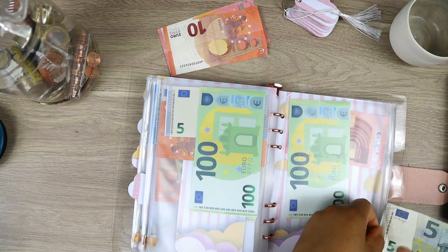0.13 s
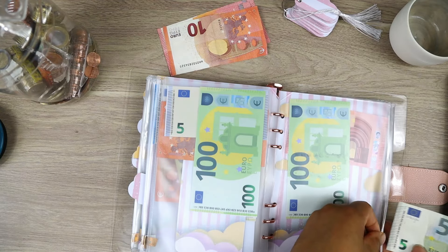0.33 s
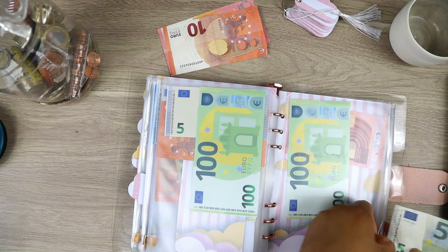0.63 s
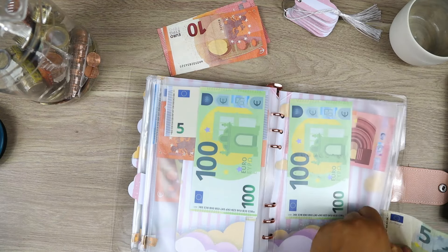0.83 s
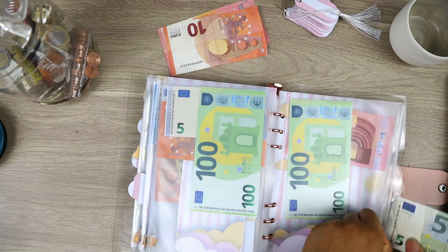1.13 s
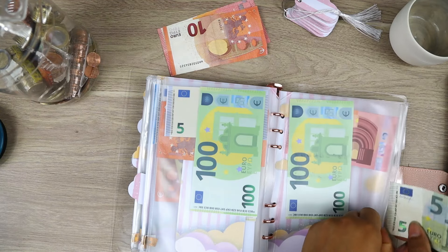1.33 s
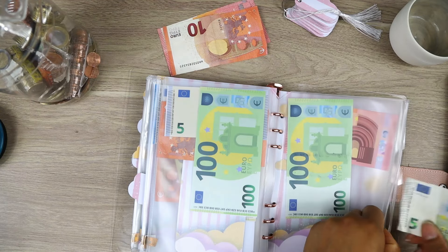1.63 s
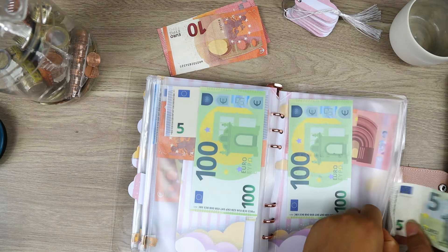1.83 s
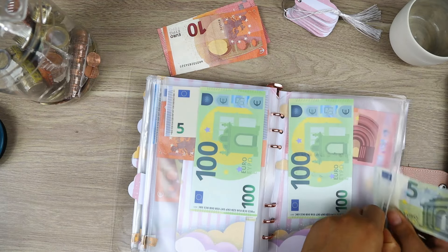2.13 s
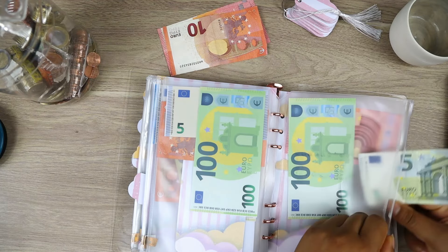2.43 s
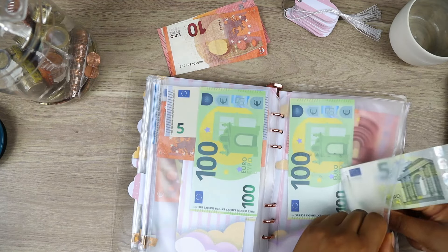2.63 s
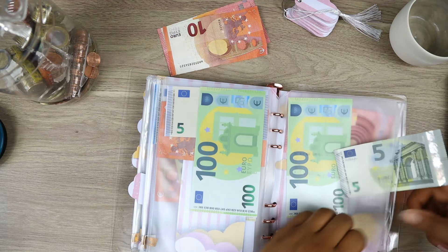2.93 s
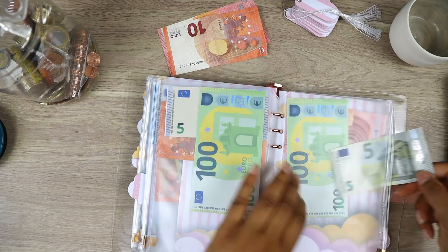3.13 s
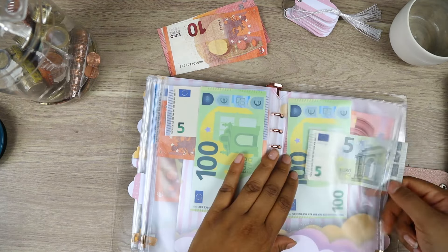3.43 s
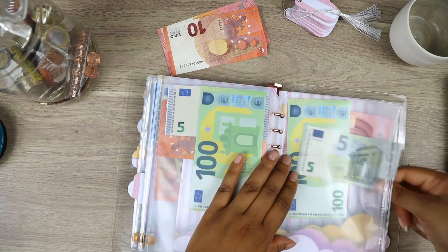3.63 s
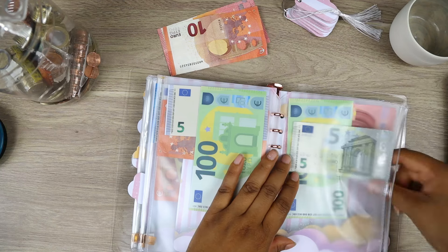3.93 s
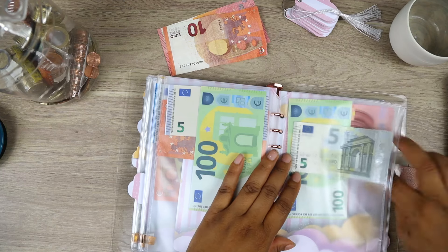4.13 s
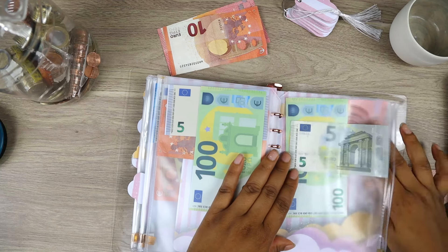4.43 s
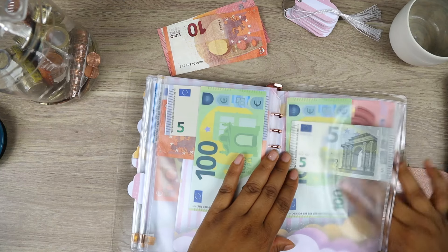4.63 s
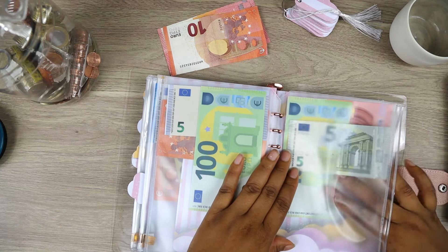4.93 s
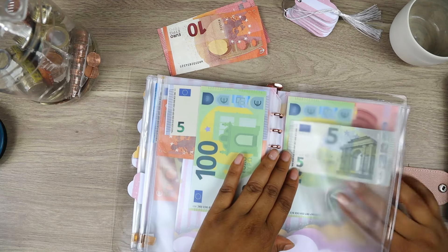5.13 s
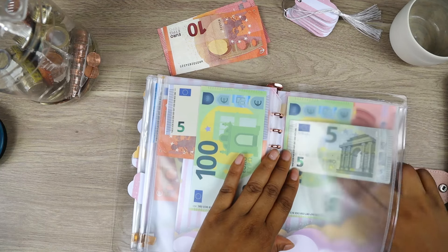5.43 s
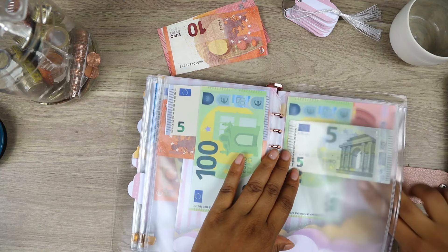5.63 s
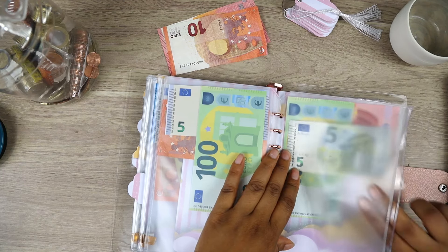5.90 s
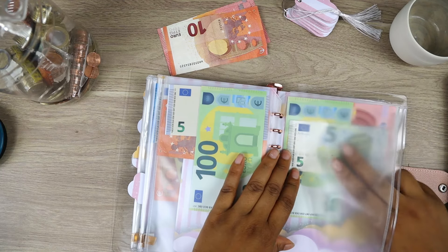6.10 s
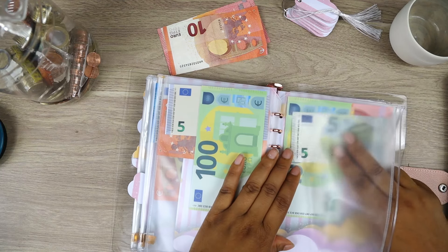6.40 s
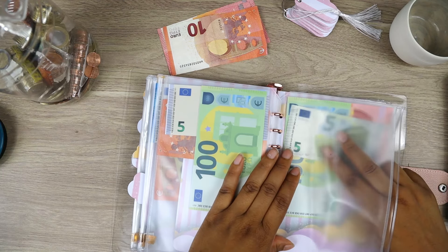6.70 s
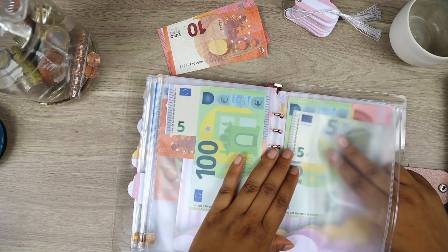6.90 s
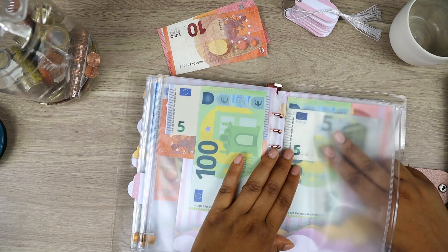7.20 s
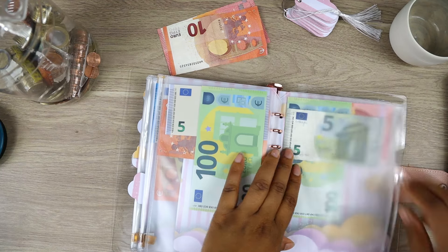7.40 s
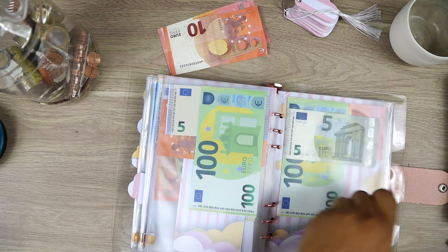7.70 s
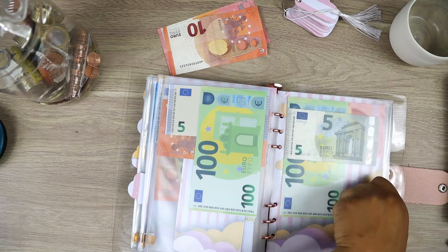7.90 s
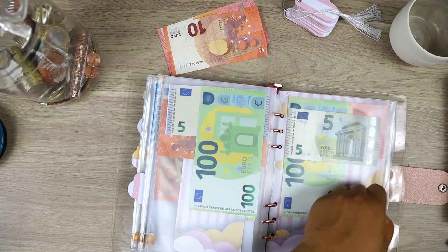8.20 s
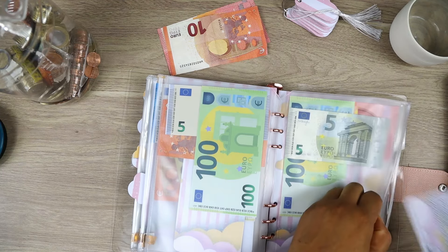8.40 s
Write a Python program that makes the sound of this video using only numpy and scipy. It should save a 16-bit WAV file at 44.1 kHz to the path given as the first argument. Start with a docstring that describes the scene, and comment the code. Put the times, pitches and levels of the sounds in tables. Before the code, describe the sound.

Thin plastic film buckles in dry, irregular clicks over papery swishes, heard close and slightly to the right. The busiest, loudest crackling comes in the first two and a half seconds, further snaps follow around three and a half, then gentle smoothing by fingers. Late on, plastic pops and dull light bumps on the wooden desk return. Faint room hiss and hum lie beneath.

```python
"""A clear plastic binder pocket takes a banknote on a wooden desk, close under a stereo microphone.
Its film buckles in sharp snaps: short noise bursts, coloured by the pocket, with a brief ring of modes.
Paper and fingers rub over it: noise driven by dense tiny slips, with ticking creases. Hand and binder
bump the desk, which sounds as decaying modes and noise. A small room answers with two echoes and a
diffuse tail, over faint shaped room noise, mains hum and a thin electronic whine."""
import sys
import numpy as np
from scipy import signal
from scipy.fft import rfft, irfft, next_fast_len
from scipy.io import wavfile
from scipy.ndimage import uniform_filter1d

SR = 44100
rng = np.random.default_rng(int(sys.argv[2]) if len(sys.argv) > 2 else 0)


def pcm_store(signal):
    """Save signal as 16-bit PCM."""
    levels = np.round(np.clip(np.atleast_2d(signal), -1, 1) * 32767)
    wavfile.write(sys.argv[1], SR, levels.astype(np.int16).T)


N = 377055
TIME = np.arange(N) / SR  # s

# Room noise at the microphone, relative outline: hz [Hz], level_db [dB]
AIR_OUTLINE = [(25, -17), (60, -2.5), (105, -2), (160, -7), (400, -4), (600, -10), (850, -6), (1250, -12),
               (1430, 0), (1650, -7), (3000, -9.5), (6000, -15), (10000, -19), (15500, -18.5)]
# Paper or fingers slide over the film. The pocket's edge is picked open; the note is drawn out and
# brought to the opening, then pushed in; fingers follow it and nudge it home; the hand withdraws and
# takes hold of the page.
# start_s [s], length_s [s], level_db [dB, before the swell], brightness_db [dB, relative]
STROKES = [ (-.03, 0.084, -34.5, -2.5), (0.1, 0.13, -46.5, -6), (0.284, 0.19, -47, -1),
           (0.846, 0.39, -53.5, -2), (1.002, 0.11, -43.5, 0), (1.155, 0.035, -40, -2.5),
           (1.243, 0.045, -40.5, -3), (1.343, 0.28, -49.5, -2), (1.656, 0.11, -38, -5),
           (1.934, 0.16, -41.5, -4.5), (2.178, 0.13, -40.5, -4), (2.245, 0.082, -32.5, 1),
           (2.332, 0.15, -30, -0.5), (2.467, 0.12, -43, -3), (2.704, 0.052, -46, 0), (2.842, 0.1, -43, 1.5),
           (2.919, 0.077, -42.5, -5), (3.009, 0.14, -37.5, -2.5), (3.164, 0.16, -46.5, -1.5),
           (3.287, 0.21, -37.5, -2.5), (3.53, 0.12, -35.5, -4.5), (3.715, 0.035, -41, 1),
           (3.778, 0.17, -41, 1), (3.918, 0.085, -40.5, -1.5), (4.05, 0.084, -46, -2.5),
           (4.171, 0.16, -51, -1), (4.319, 0.12, -43, -3), (4.668, 0.13, -44, -4), (4.717, 0.053, -41, -1),
           (4.774, 0.14, -40.5, -3), (5.068, 0.021, -50.5, -5), (5.227, 0.18, -43, -7),
           (5.431, 0.13, -35, -8.5), (5.6, 0.14, -50, -5), (5.687, 0.27, -48, -6), (5.98, 0.2, -51, -2.5),
           (6.143, 0.19, -45.5, -5), (6.425, 0.086, -58.5, 2.5), (6.502, 0.045, -52, -1),
           (6.693, 0.1, -51.5, -1), (6.919, 0.078, -51, -2.5), (7.06, 0.097, -58.5, -4),
           (7.414, 0.075, -44, -2.5), (7.474, 0.077, -40.5, 1), (7.526, 0.11, -50, -7.5),
           (7.666, 0.28, -52, -3.5), (7.925, 0.18, -49, -4.5), (8.115, 0.068, -36.5, -1),
           (8.232, 0.086, -45, -2), (8.327, 0.54, -52, 2)]
# Rubbed film and paper, relative outline inside each register: hz [Hz], level_db [dB]
RUB_OUTLINE = [(40, -52.5), (110, -10), (230, -16), (310, -11.5), (570, -17), (820, -3), (1500, 2),
               (2600, 0.5), (4200, 6.5), (8500, 0), (15500, -6.5)]
# Skin on film hisses higher than paper does: time_s [s], top_octave_db [dB]
SHEEN = [(1.5, -3), (3.3, 0), (4.4, 4.5), (4.7, 0.5), (7.5, -0.5), (8.3, -5)]
# Tiny creases that tick while the film is moved, relative outline: hz [Hz], level_db [dB]
CREASE_OUTLINE = [(100, -48), (400, -2), (1000, -13), (2000, 3.5), (5500, -16.5), (15500, -7)]
# Resonances of the pocket stack: pitch_hz [Hz], width_hz [Hz], lift_db [dB]
POCKET_RESONANCES = [(780, 365, 5), (1440, 290, 2), (1820, 98, 3.5), (2420, 42, 3.5)]
# Where the hands work: time_s [s], place [0 = open edge of the pocket, 2 = its middle]
HAND_PLACE = [(0, 0.24), (2, 0.44), (4.2, 1.16), (5.6, 0.66), (6.8, 1.66), (7.8, 1.18)]
# The film buckles: time_s [s], level_db [dB, rms of the first 6 ms before the room], ring_hz [Hz],
# body_db [dB, offset of the lows], crack_db [dB, offset of the treble], length_ms [ms, decay to 1/e]
SNAPS = [(0.0176, -32.5, 2040, -10, -18, 1.6), (0.042, -30.5, 1540, -36, -27, 2.6),
         (0.0895, -33, 2350, -6.5, -13.5, 3.2), (0.358, -24.5, 1530, -9.5, -18.5, 1.5),
         (0.3648, -25.5, 2380, -21, -24, 8.2), (0.37, -21, 2440, -9, -6.5, 1.9),
         (0.4603, -33, 1820, -14, -7, 0.59), (0.5622, -45, 2690, 5, 0, 5.4),
         (0.7061, -38.5, 2310, 0, -10.5, 0.68), (0.893, -43, 1960, -3, -15, 2.3),
         (0.9571, -42.5, 2030, 0, -13.5, 4.5), (1.155, -35, 2100, -8, -9, 0.5),
         (1.188, -39, 2420, -5, -4, 2.8), (1.243, -31.5, 3230, -2.5, -8.5, 9.1),
         (1.262, -34, 2070, 2, -16, 0.93), (1.2787, -35.5, 3440, -16, -13, 2.3),
         (1.2883, -36.5, 3080, -10, 8, 3.3), (1.3707, -35.5, 3010, -3, -10, 1.2),
         (1.411, -29.5, 2250, -5.5, -9, 1.7), (1.541, -38.5, 800, 8, -21, 3),
         (1.586, -30, 3040, -1, -8, 0.84), (1.655, -34.5, 880, -9, -25, 0.9),
         (1.7177, -19.5, 1840, -15, -15, 0.66), (1.7946, -33, 1410, -12, -25, 0.74),
         (1.93, -32, 1830, -4.5, -18.5, 1.2), (1.9609, -36.5, 3180, 6, 0, 1.7),
         (2.0281, -27, 1300, -11, -19, 3.4), (2.054, -17.5, 2036, -3, -10, 1.2),
         (2.2666, -24, 2720, -21, -17, 2.2), (2.277, -29, 4530, -32, -28, 3),
         (2.3683, -26.5, 2800, -28, -21, 8), (2.383, -30, 1890, -33, -21, 6.6),
         (2.4135, -36, 2700, -25, -23, 1.7), (2.428, -29, 4540, -15, -6, 2.8),
         (2.444, -25, 2570, -16, -16, 4.5), (2.5568, -39, 730, 4, -11, 0.83),
         (2.961, -35, 1900, -10, -18, 1), (3.051, -28.5, 2000, -6, -10, 1.7),
         (3.1424, -33, 1820, -11, -11, 1.5), (3.312, -28, 2270, -12.5, -19, 7.5),
         (3.4095, -22, 1570, -9, -7, 7.5), (3.4138, -17.5, 1416, -37, -35, 0.66),
         (3.541, -27.5, 1340, -11, -18.5, 4.2), (3.6024, -28.5, 2113, -14, -4.5, 1.7),
         (3.8698, -41, 921, 4, -17, 1.1), (3.917, -35, 4030, -23, -33, 2.7),
         (3.9866, -36.5, 1606, -8, -19, 3), (4.0285, -31, 2110, -9, -8, 5.7),
         (4.0445, -35, 1900, -7, -11, 3.1), (4.221, -41.5, 3080, -9, -11, 21),
         (4.356, -36.5, 910, 3, -10, 2.4), (4.4035, -43, 3070, -4, 1, 0.78),
         (4.416, -34.5, 1420, 11, -4, 2), (4.6367, -41.5, 1720, -6, -19, 0.3),
         (4.7972, -34.5, 840, -4.5, -33, 0.7), (5.035, -49.5, 2620, -15, -16, 1),
         (5.2405, -38.5, 1670, -2, -21.5, 0.22), (5.4975, -30.5, 1020, -16, -32, 1.1),
         (5.5184, -27.5, 2100, -21, -12.5, 2.7), (5.8749, -39, 1220, 5, -12, 2.4),
         (6.0288, -34.5, 934, -0.5, -9, 1.8), (6.187, -36.5, 970, -2, -17, 14),
         (6.2758, -42, 825, -5, -21, 3.7), (6.931, -47.5, 3320, -18, -13, 1.7),
         (7.0671, -51, 3320, -12, -19, 1.2), (7.3875, -49, 2500, 5, -3, 3),
         (7.402, -44, 3780, -4, -16, 2.5), (7.4412, -39.5, 1680, -3, -26, 2.2),
         (7.7232, -32.5, 1780, -1, -9.5, 1.1), (7.735, -38, 1440, -11, -13, 1.1),
         (7.757, -38.5, 1780, -11, -22, 1.8), (7.8075, -32, 3320, -8.5, -16.5, 5.1),
         (7.8437, -39, 2540, -17, -9, 3), (7.9184, -36, 1160, 8.5, -6.5, 4.4),
         (7.9457, -38.5, 2540, -9, -13, 0.72), (7.9732, -41, 1120, -2, -13, 0.5),
         (8.0182, -38.5, 2570, 1.5, -12, 1.5), (8.13, -34, 1250, 1, -21, 3.3),
         (8.1573, -31, 1140, 2, -26, 0.91), (8.176, -26, 860, -3, -22.5, 5.14),
         (8.3047, -42.5, 890, -6, -13, 1.1), (8.3863, -35, 1850, -6, -20, 2.6)]
# Crack of a snap, added to its crack_db: hz [Hz], lift_db [dB]
CRACK_OUTLINE = [(5500, 6), (9500, -5), (15500, -6)]
# Hand and binder bump the desk: time_s [s], knock_db [dB, relative], boom_db [dB, relative],
# rumble_db [dB, settling binder in the mix with the low modes]
BUMPS = [(2.557, -38, -58, 1), (2.959, -43.5, -66, -5), (3.05, -38.5, -66, 3), (5.464, -43, -61, -4),
         (5.52, -41, -44.5, -16), (5.879, -45, -82, -5), (7.438, -42, -57.5, -7), (7.732, -42, -42, 10),
         (7.768, -50, -48, 14), (7.81, -39.5, -44, 8), (7.92, -46, -53, 5), (8.13, -56, -48, -30),
         (8.182, -56, -47.5, -22), (8.306, -44, -53, 25), (8.386, -50, -56, -5.5)]
# Modes of the desk top: pitch_hz [Hz, before detuning], t60_s [s], level_db [dB, relative]
DESK_MODES = [(50, 0.11, -38), (78, 0.16, -37), (124, 0.27, -7), (301, 0.066, 6.5), (332, 0.091, -10),
              (428.6, 0.22, -3)]
# How the spots reach the microphone from its right: place [as above], lag_ms [ms, left port behind
# right], pan_db [dB, left minus right in short waves, before the treble tilt]
PORTS = [(0, 0.11, -2.5), (1, 0.099, -5.5), (2, 0.033, -5)]
# Two nearby hard surfaces throw each sound back: left_ms [ms after the direct sound at the left
# port], right_ms [ms, likewise at the right port], level_db [dB against the direct sound]
ECHOES = [(7.3, 7.6, -15.5), (10.2, 9.9, -16.5)]

# seven spots on the pocket that sound, from 0 at its open edge to 2 at its middle
SPOTS = np.linspace(0, 2, num=7)
AIR_DB, HUM_DB, WHINE_DB = -56.5, -73.5, -72  # rms
HUM_HZ, WHINE_HZ = 100.3, 15677
# every stroke gathers speed, swells in its middle and dies away once the hand stops
ATTACK_S, SWELL_DB, RELEASE_T60_S = 0.029, 2, 0.22
# the resting hand never lies quite still: level and brightness of its faint rubbing
REST_DB, REST_BRIGHT_DB = -70, -20
# a middling stroke: level, brightness, body against its level, dB of body lost per dB of added strength
STROKE_DB, STROKE_BRIGHT_DB, STROKE_BODY_DB, STROKE_THINNING = -46.5, 2, -15, 0.54
# bending waves cross the film more slowly the lower they are: travel time at 1 kHz
BEND_MS = 0.5
EARLY_DB, EARLY_T60_S, ROOM_DB, ROOM_T60_S = -0.32, 0.078, -6.5, 0.39
PAN_TREBLE_DB = -3.5  # further left minus right, reached at TOP_HZ
TOP_HZ = 16100  # upper limit of the recorder
# the desk's bumps reach the microphone through its stand and through the air
DESK_STAND_DB, DESK_AIR_DB = -3, -4.5


def to_gain(db):
    """Decibels to amplitude gain."""
    return 10 ** (np.asarray(db) / 20)


def unit(x):
    """Scale to rms 1."""
    return x / np.sqrt(np.mean(x ** 2) + 1e-30)


def outline_db(points, hz):
    """Decibels of a (hz, dB) outline, interpolated over log frequency."""
    corner_hz, db = np.transpose(points)
    return np.interp(np.log(hz + 1), np.log(corner_hz), db)


def filtered(x, gain):
    """Filter by a function from frequency to gain."""
    size = next_fast_len(x.shape[-1])
    spectrum = rfft(x, size) * gain(np.fft.rfftfreq(size, 1 / SR))
    return irfft(spectrum, size)[..., :x.shape[-1]]


def band(x, lo_hz, hi_hz, order=8):
    """Keep one band; neighbouring bands add up to the whole."""
    return filtered(x, lambda f: 1 / (1 + (f / hi_hz) ** order) - 1 / (1 + (f / lo_hz) ** order))


def fade(t, t60):
    """Exponential decay by 60 dB in t60 seconds."""
    return np.exp(-np.log(1000) * t / t60)


def walk(rate):
    """Random wander of rms 1, with about `rate` new values a second."""
    hold = max(int(SR / rate), 1)
    held = np.repeat(rng.standard_normal(N)[:N // hold + 1], hold)[:N]
    return unit(uniform_filter1d(held, hold))


def add(track, s, sound):
    """Mix a sound in at time s; what lies outside the track is dropped."""
    start = min(int(s * SR), N - 1)
    part = sound[max(-start, 0):N - start]
    track[max(start, 0):max(start, 0) + len(part)] += part


def causal(gain):
    """Impulse response with the given gains and the promptest possible attack (minimum phase)."""
    cepstrum = irfft(np.log(gain))
    half = len(cepstrum) // 2
    cepstrum[1:half] *= 2
    cepstrum[half + 1:] = 0
    return irfft(np.exp(rfft(cepstrum)))


def background(wide_hz=1300):
    """Room noise differs between the ports only in short waves; hum and whine are sines alike at both."""
    noise = rng.standard_normal((2, N))
    mid, side = filtered(noise, lambda f: to_gain(outline_db(AIR_OUTLINE, f)))
    side = filtered(side, lambda f: f / np.hypot(f, wide_hz))
    air = unit(mid + np.array([[1], [-1]]) * side)
    # the whine's pitch wanders by a few hertz, the air's level by half a decibel
    whine = np.sin(2 * np.pi * np.cumsum(WHINE_HZ + 5 * walk(20)) / SR)
    hum = np.sin(2 * np.pi * HUM_HZ * TIME)
    air = air * to_gain(AIR_DB + .5 * walk(6.1))
    return air + unit(hum) * to_gain(HUM_DB) + unit(whine) * to_gain(WHINE_DB)


def pocket_db(hz):
    """Lift that the pocket's resonances give to each frequency."""
    return sum(db / (1 + (2 * (hz - f) / width) ** 2) for f, width, db in POCKET_RESONANCES)


def pocket_response(points, size=1024):
    """Impulse response of an outline, coloured by the pocket's resonances."""
    hz = np.fft.rfftfreq(size, 1 / SR)
    return causal(to_gain(outline_db(points, hz) + pocket_db(hz)))


def strokes():
    """Strength and brightness (dB) of the rubbing over time; overlapping strokes add in power."""
    power = np.full(N, to_gain(REST_DB) ** 2)
    weighted_bright = power * REST_BRIGHT_DB
    t = TIME[:SR * 3 // 4]
    for s, length_s, db, bright_db in STROKES:
        attack = np.minimum(t / ATTACK_S, 1)
        swell = to_gain(SWELL_DB * (np.sin(np.pi * np.minimum(t / length_s, 1)) - 2))
        release = fade(np.maximum(t - length_s, 0), RELEASE_T60_S)
        envelope = to_gain(db) * attack * swell * release
        add(power, s, envelope ** 2)
        add(weighted_bright, s, envelope ** 2 * bright_db)
    return np.sqrt(power), weighted_bright / power


def crinkle(per_s, spread_db, slip_s):
    """Power of a run of slips: very unequal in size, each dying within a few milliseconds; mean 1."""
    sizes = to_gain(spread_db * np.minimum(rng.exponential(size=N), 4))
    hits = (rng.random(N) < per_s / SR) * sizes ** 2
    power = signal.lfilter([1], [1, -np.exp(-2 / (slip_s * SR))], hits)
    return power / (power.mean() + 1e-30)


def creases(strength, per_s=70, spread_db=5.5, level_db=-7, masking=0.47,
            lo_hz=1000, hi_hz=6500, sharpness=1.8):
    """Creases give way in unequal ticks on one of nine pitches; in strong strokes they sink into the hiss."""
    pitches = np.geomspace(lo_hz, hi_hz, num=9)
    sizes = to_gain(spread_db * np.clip(rng.standard_normal(N), -2, 2))
    ticks = (rng.random(N) < per_s / SR) * sizes
    which = rng.integers(len(pitches), size=N)
    rung = np.zeros(N)
    for k, hz in enumerate(pitches):
        rung += signal.lfilter(*signal.iirpeak(hz, sharpness, fs=SR), ticks * (which == k))
    sound = unit(signal.oaconvolve(rung, pocket_response(CREASE_OUTLINE))[:N])
    return sound * to_gain(level_db) / np.maximum(strength / to_gain(STROKE_DB), 1) ** masking


def sliding(slips_per_s=380, spread_db=4.5, slip_s=0.00074, chatter_db=0.62, flex_db=0.82,
            tilt_share=0.52, wander=5.7, mid_db=-8.5, upper_db=-2.0, bright_db=-2.5, top_db=-7):
    """Tiny slips over a smooth paper hiss; some excite the whole film, others only one register."""
    strength, bright = strokes()
    sheen = np.interp(TIME, *np.transpose(SHEEN))
    shared_slips = crinkle(slips_per_s, spread_db, slip_s)
    colour = pocket_response(RUB_OUTLINE)
    # soft strokes sound fuller in the lows; strong strokes are thinner and hiss more
    body = STROKE_BODY_DB - STROKE_THINNING * (20 * np.log10(strength) - STROKE_DB)
    tilt = tilt_share * (bright - STROKE_BRIGHT_DB)
    edges_hz = [30, 680, 1600, 3600, 8000, 17000]
    registers_db = [body, mid_db - tilt, upper_db + tilt, bright + bright_db, bright + sheen + top_db]
    out = creases(strength)
    for lo, hi, db in zip(edges_hz, edges_hz[1:], registers_db):
        own_slips = crinkle(slips_per_s, spread_db, slip_s)
        power = 1 + shared_slips + own_slips  # the 1 is the smooth hiss
        rub = signal.oaconvolve(rng.standard_normal(N) * np.sqrt(power), colour)[:N]
        out = out + unit(band(rub, lo, hi, order=16)) * to_gain(db + flex_db * walk(25))
    # the point of contact wanders between the spots
    place = np.interp(TIME, *np.transpose(HAND_PLACE))
    share = np.array([np.exp(wander * walk(14) - 2 * (place - spot) ** 2) for spot in SPOTS])
    share /= np.linalg.norm(share, axis=0)
    return out * strength * to_gain(chatter_db * walk(70)) * share


def bent(x):
    """Travel through the film: the treble arrives first, so a click becomes a tiny falling chirp."""
    return filtered(x, lambda f: np.exp(-4j * np.pi * BEND_MS / 1000 * np.sqrt(1000 * f)))


def patch(ring_hz, spread=0.1876, t60_s=0.062):
    """A bent patch of film rings on in six modes scattered around its pitch."""
    t = TIME[:SR // 6]
    detune, phase = rng.standard_normal((2, 6, 1))
    modes = np.sin(2 * np.pi * (ring_hz * np.exp(spread * detune) * t + phase))
    return unit(modes.sum(axis=0)) * fade(t, t60_s)


def snaps(flutter=0.36, shoulder_db=-2.5, lead_in_db=-13, lead_in_share=0.9, ring_db=-11.0):
    """A faint, fast noise swell leads into each snap of the film; the bent patch rings briefly."""
    out = np.zeros((len(SPOTS), N))
    lead, first = int(.008 * SR), int(.006 * SR)  # samples of lead-in, and of the levelled onset
    t = (np.arange(SR // 32) - lead) / SR
    for s, db, ring_hz, body_db, crack_db, ms in SNAPS:
        age = abs(t) / (max(ms, .2) * 1e-3)
        lead_in = to_gain(lead_in_db) * np.exp(-age / lead_in_share)
        envelope = np.where(t < 0, lead_in, np.exp(-age))
        push = flutter * rng.standard_normal(len(t)) * envelope
        push[lead] += 1
        # flatten the burst's spectrum, so that the outline below sets its colour
        spectrum = rfft(push)
        push = irfft(spectrum / np.sqrt(uniform_filter1d(abs(spectrum) ** 2, size=36)), len(t))
        body = [(60, body_db - 53.0), (300, body_db - 6.5), (520, body_db - 7.5)]
        ring = [(max(ring_hz / 1.047, 620), shoulder_db), (ring_hz, 1),
                (ring_hz * 1.29, shoulder_db + crack_db / 7)]
        crack = [(hz, crack_db + lift) for hz, lift in CRACK_OUTLINE]
        colour = pocket_response(sorted(body + ring + crack))
        snap = bent(signal.fftconvolve(push, colour))
        onset_rms = np.sqrt(np.mean(snap[lead:lead + first] ** 2))
        # it sounds from a spot near the hands
        place = np.interp(s, *np.transpose(HAND_PLACE)) + rng.uniform(-.5, .5)
        spot = np.argmin(abs(SPOTS - place))
        add(out[spot], s - lead / SR, snap * to_gain(db) / onset_rms)
        add(out[spot], s, patch(ring_hz) * to_gain(db + ring_db))
    return out


def bumps(knock_offset_db=-9, thud=0.4, thud_t60_s=0.22, rumble_t60_s=0.085):
    """Fingertips knock the desk's upper modes; the weight of the hand drives its low ones."""
    out, t = np.zeros(N), TIME[:SR // 2]
    first = SR // 50  # both parts are levelled over their first 20 ms
    mode_hz, mode_t60_s, mode_db = np.transpose(DESK_MODES)[:, :, None]
    for s, knock_db, boom_db, rumble_db in BUMPS:
        detune = 1 + 0.019 * rng.standard_normal((len(DESK_MODES), 1))
        rings = to_gain(mode_db) * np.sin(2 * np.pi * mode_hz * detune * t) * fade(t, mode_t60_s)
        rings *= rng.choice([-1, 1], (len(DESK_MODES), 1))  # each mode starts upward or downward at random
        noise = rng.standard_normal(len(t))
        rumble = unit(band(noise, 50, 147)) * fade(t, rumble_t60_s)
        boom = rings[:3].sum(axis=0) + to_gain(rumble_db) * rumble
        knock = rings[3:].sum(axis=0) / 2 + thud * unit(band(noise, 330, 540)) * fade(t, thud_t60_s)
        sound = boom * to_gain(boom_db) / np.std(boom[:first])
        sound += knock * to_gain(knock_db + knock_offset_db) / np.std(knock[:first])
        add(out, s, sound * (1 - np.exp(-t / 0.0005)))
    return out


def evened(paths):
    """Smooth the coarse colour of the echoes, so that the room sounds neutral."""
    power = np.mean(abs(rfft(paths)) ** 2, axis=0)
    gain = np.sqrt(uniform_filter1d(power, size=2000) / uniform_filter1d(power, size=70))
    return signal.fftconvolve(paths, causal(gain)[None], axes=1)[:, :paths.shape[1]]


def room(x, lag_ms, pan_db, wide_hz=780, shadow_hz=600, tail_treble_db=-4, wet_pan_db=-2):
    """One spot at both ports: desk and nearby things reflect it at once, the walls a little later."""
    t = TIME[:SR // 2]
    hz = np.fft.rfftfreq(len(t), 1 / SR)
    sides = np.array([[1], [-1]])  # left, right
    # the microphone's body shadows only short waves
    pan = pan_db * hz / np.hypot(hz, shadow_hz) + PAN_TREBLE_DB * hz / TOP_HZ
    port_gain = to_gain(sides * pan / 2) / np.sqrt(np.cosh(np.log(to_gain(pan))))
    # the sound reaches the right port first; a short lead holds the fractional delay
    lead = 16  # samples
    delay_s = lead / SR + sides * lag_ms / 2000
    direct = irfft(port_gain * np.exp(-2j * np.pi * hz * delay_s), len(t))
    early = unit(fade(t, EARLY_T60_S) * (t > .0015)) * to_gain(EARLY_DB)
    late = unit(fade(t, ROOM_T60_S) * (t > .008)) * to_gain(ROOM_DB)
    # long waves reach both ports alike
    mid, side = rng.standard_normal((2, len(t)))
    mid = filtered(mid, lambda f: np.sqrt(1 + 1 / (1 + (f / wide_hz) ** 2)))
    side = filtered(side, lambda f: f / np.hypot(f, wide_hz))

    def tail_gain(f):
        """Treble loss and sideways lean of the diffuse sound."""
        treble = outline_db([(1500, 0.0047), (12000, tail_treble_db)], f)
        return to_gain(treble + sides * wet_pan_db / 2 * f / np.hypot(f, shadow_hz))

    diffuse = filtered(mid + sides * side, tail_gain)
    echoes = diffuse * np.hypot(early, late) / np.sqrt(2 * len(t))
    for *delays_ms, db in ECHOES:
        ports = [np.roll(port, int(ms * SR / 1000)) for port, ms in zip(direct, delays_ms)]
        echoes += to_gain(db) * np.array(ports)
    return signal.oaconvolve(x[None], evened(direct + echoes), axes=1)[:, lead:lead + N]


def scene():
    """Film and paper sound from their spots; the desk from the last one, and it shakes the stand."""
    sources, desk = sliding() + snaps(), bumps()
    sources[-1] += desk * to_gain(DESK_AIR_DB)
    place, *columns = np.transpose(PORTS)
    lags, pans = (np.interp(SPOTS, place, column) for column in columns)
    through_air = sum(room(x, lag, pan) for x, lag, pan in zip(sources, lags, pans))
    return through_air + desk * to_gain(DESK_STAND_DB) + background()


def record(dry):
    """The recorder rounds the very loudest peaks and cuts the top."""
    rounded = dry / (1 + (dry / .9) ** 6) ** (1 / 6)
    return signal.sosfilt(signal.ellip(10, .2, 80, TOP_HZ, fs=SR, output="sos"), rounded)


dry = scene()
out = record(dry)
pcm_store(out)
```